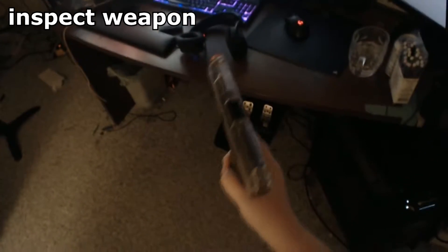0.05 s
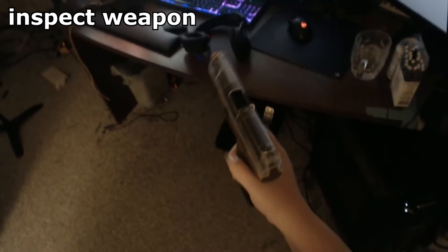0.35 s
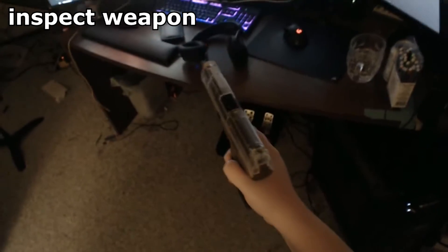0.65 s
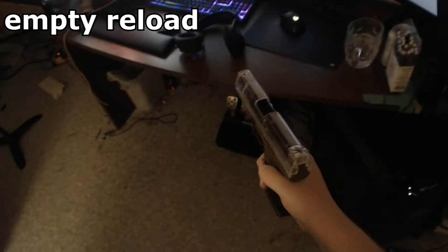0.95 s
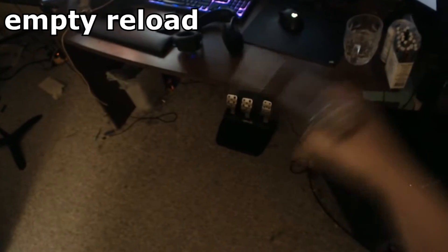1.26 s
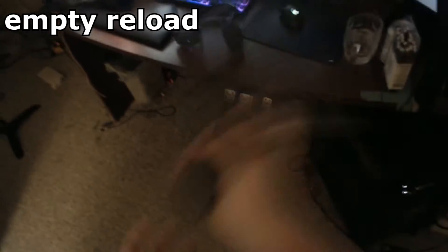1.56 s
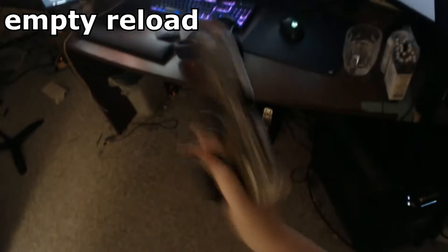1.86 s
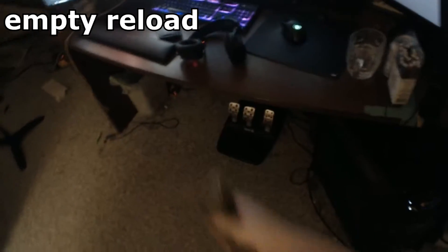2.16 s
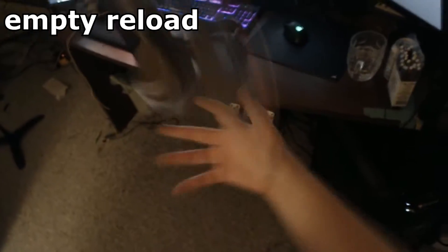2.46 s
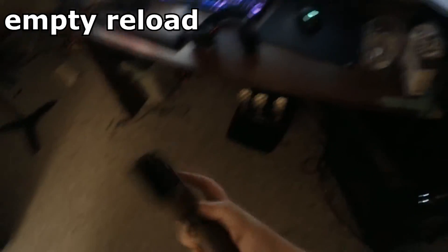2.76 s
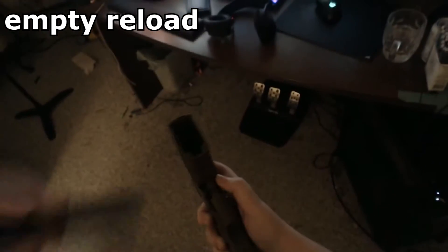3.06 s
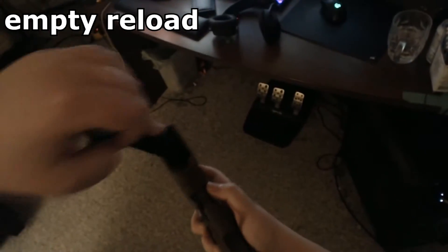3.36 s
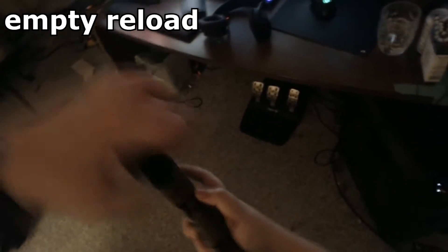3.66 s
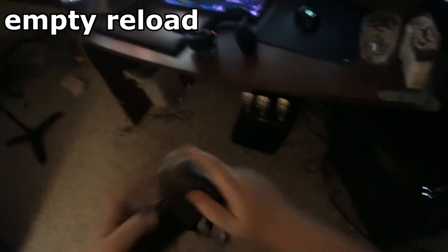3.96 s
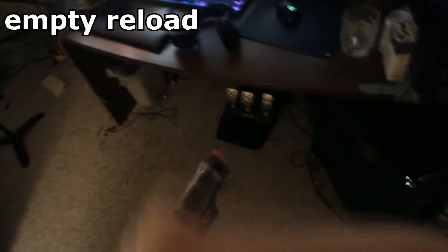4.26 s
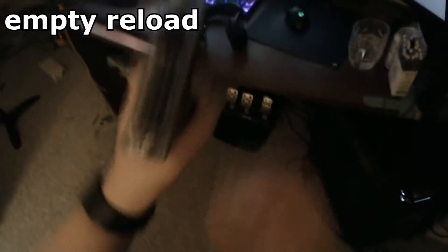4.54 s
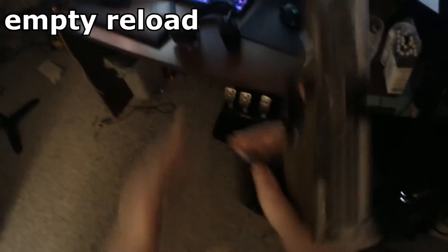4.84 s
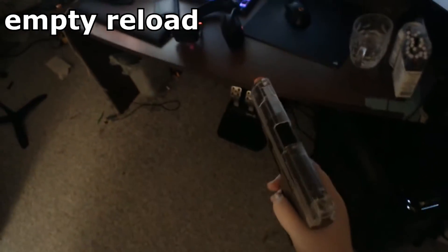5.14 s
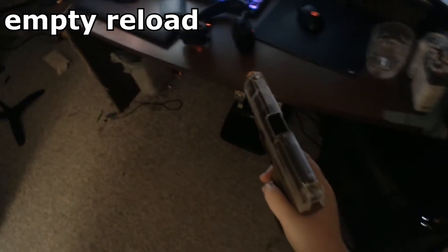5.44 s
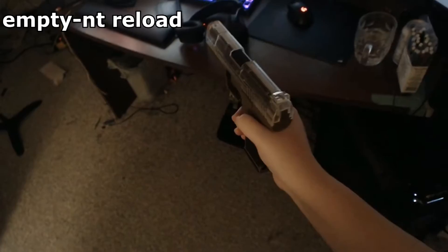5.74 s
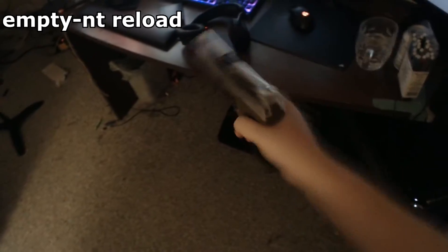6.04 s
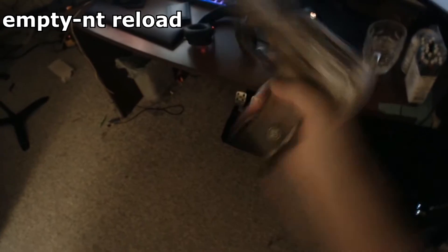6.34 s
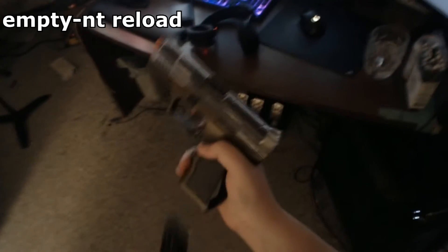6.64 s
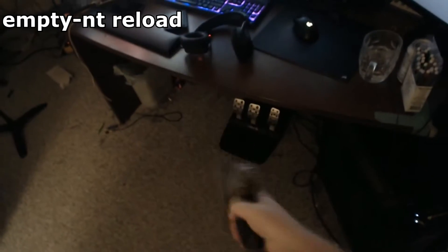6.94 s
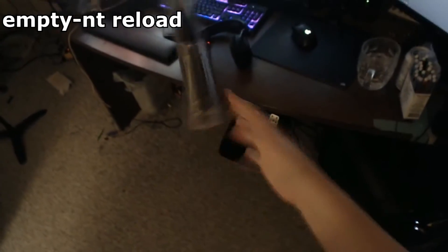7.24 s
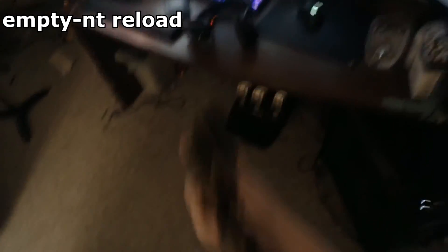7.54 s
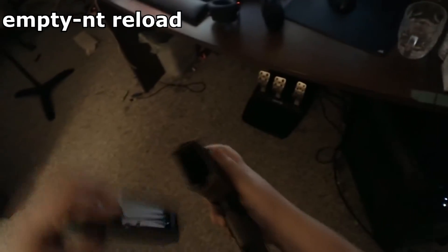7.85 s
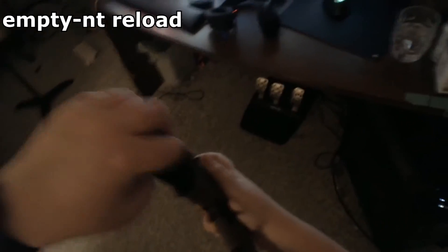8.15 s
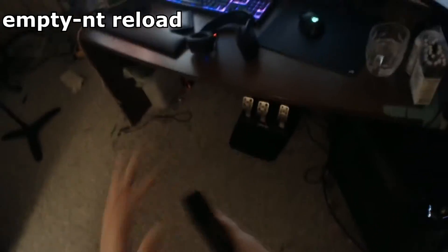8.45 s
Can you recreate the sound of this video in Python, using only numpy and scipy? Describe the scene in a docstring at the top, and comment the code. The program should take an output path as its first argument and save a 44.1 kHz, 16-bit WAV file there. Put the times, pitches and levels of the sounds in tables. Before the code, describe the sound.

A pistol is handled and reloaded twice, with sharp metallic magazine clicks and one slide rack, in a quiet room.

```python
"""A small, quiet room with humming equipment; a pistol is handled close to the microphone.
At 1.5 s the magazine knocks its way out, then the gun is flipped and caught in the palm. A magazine
taps the well and latches at 3.6 s; the slide is racked and slams shut at 4.3 s. A faint squeak of skin,
and from 6.2 s a second reload, pushed home at 8.2 s. Each blow and scrape rings the steel and the
room; loose parts tick and ping in between."""
import sys
import numpy as np
from scipy import signal
from scipy.fft import rfft, irfft
from scipy.io import wavfile
from scipy.ndimage import uniform_filter1d

SR = 44100
rng = np.random.default_rng(int(sys.argv[2]) if len(sys.argv) > 2 else 0)


def materialize(psi):
    """Save the field psi as 16-bit PCM at rate SR to the path in sys.argv[1].

    A 1-D psi becomes a single channel; in a 2-D psi each row is a channel.
    """
    bounded = np.clip(np.atleast_2d(psi).T, -1, 1)
    quanta = np.round(bounded * 32767).astype(np.int16)
    wavfile.write(sys.argv[1], SR, quanta)


N = 383669
LENGTH = 24576  # samples in one event and its tail


def amp(db):
    return 10 ** (np.asarray(db) / 20)


def unit_rms(x):
    return x / np.sqrt(np.mean(x ** 2) + 1e-20)


def curve_at(points, hz):
    """Straight lines between points on a log-frequency axis."""
    point_hz, value = np.transpose(points)
    return np.interp(np.log(hz + 1), np.log(point_hz + 1), value)


def add(mix, start_s, sound):
    part = mix[max(round(start_s * SR), 0):][:len(sound)]
    part += sound[:len(part)]


def bell(hz, centre_hz, width_hz):
    """The outline of one resonance, 1 at its centre."""
    return 1 / (1 + (2 * (hz - centre_hz) / width_hz) ** 2)


def flat_noise():
    """Noise with an even spectrum: all colour is left to the resonances."""
    return unit_rms(irfft(np.exp(2j * np.pi * rng.random(LENGTH // 2 + 1)), LENGTH))


def wander(count):
    """Slow drift of about unit size; a higher count moves faster."""
    return signal.resample(rng.standard_normal(count), 2 ** 19)[:N]


def knock(hz, decay_s):
    """A heavily damped resonance that swells for a moment and dies."""
    t = np.arange(LENGTH) / SR
    return t / decay_s * np.exp(1 - t / decay_s) * np.sin(2 * np.pi * hz * t)


# Colour of the air in the room: frequency_hz, gain_db
AIR_SPECTRUM = [(15,-6), (30,-5), (60,-4.5), (100,-3), (160,-4), (230,-3.5), (320,-10), (1000,-11.5),
                (1500,-20), (2100,-19), (2700,-27), (5000,-33.5), (8000,-36), (15500,-35)]
# The fan tone swells and sags: time_s, level_db
FAN_LEVELS = [(0.0, -72.5), (0.4, -64), (0.8, -62.5), (1.05, -58.5), (1.85, -65.5), (2.25, -61.5),
              (2.5, -71.5), (2.85, -60), (3.6, -57), (5.36, -58), (5.52, -69), (5.63, -59), (6.4, -58.5),
              (7.3, -55.5), (8.7, -60.5)]
def room_tone():
    """The bed of the room: air with a drifting hiss, a wavering fan tone and mains hum."""
    hz, t = np.fft.rfftfreq(N, 1 / SR), np.arange(N) / SR
    air = unit_rms(irfft(rfft(rng.standard_normal(N)) * amp(curve_at(AIR_SPECTRUM, hz)), N))
    hiss = irfft(rfft(air) * (1 - bell(hz, 0, width_hz=3800)), N)
    fan_db = np.interp(t, *np.transpose(FAN_LEVELS)) + 1.3 * wander(count=150)
    fan_hz = 124.5 + wander(count=90)
    fan = amp(fan_db) * np.sin(2 * np.pi * np.cumsum(fan_hz) / SR)
    mains = amp(-75.5) * np.sin(2 * np.pi * 60 * t) + amp(-71) * np.sin(2 * np.pi * 120 * t)
    hiss_lift_db = 1.5 + 0.36 * wander(count=12)
    air += hiss * (amp(hiss_lift_db) - 1)
    return amp(-64.5) * air + np.sqrt(2) * (fan + mains)


def fuzzy_tones(rows):
    """Short, unsteady tones: noise in one narrow resonance, faded in and out."""
    out, hz = np.zeros(N), np.fft.rfftfreq(LENGTH, 1 / SR)
    for start_s, end_s, pitch_hz, width_hz, level_db in rows:
        size = round((end_s - start_s) * SR)
        tone = irfft(rfft(flat_noise()) * bell(hz, pitch_hz, width_hz))[:size]
        add(out, start_s, amp(level_db) * unit_rms(tone) * signal.windows.tukey(size, .5))
    return out


# Spells of drone in the background: start_s, end_s, pitch_hz
DRONES = [(4.579, 4.798, 222), (4.85, 5.1, 225), (6.499, 6.777, 215), (7.268, 7.46, 213),
          (7.549, 7.797, 222)]
def low_drone(width_hz=31, level_db=-64):
    """A faint, low band of noise comes and goes."""
    return fuzzy_tones([(*spell, width_hz, level_db) for spell in DRONES])


# Reverberation of the small room: frequency_hz, t60_s
ROOM_DECAY = [(100, .12), (350, 0.13), (600, 0.37), (1000, 0.34), (1800, 0.29), (4500, 0.31), (8000, .25),
              (15000, .21)]
def room_tail():
    """Diffuse sound of the room; it builds quickly and lingers longest in the midrange."""
    hz, t, spectrum = signal.stft(flat_noise(), SR, nperseg=256)
    decay = amp(-60 * t / curve_at(ROOM_DECAY, hz)[:, None])
    tail = signal.istft(spectrum * decay, SR, nperseg=256)[1][:LENGTH]
    return tail * (1 - np.exp(-np.arange(LENGTH) / SR / 0.0015))


# A squeak and its overtone: start_s, end_s, pitch_hz, width_hz, level_db
SQUEAK = [(5.895, 6.005, 2300, 140, -68), (5.9, 6.0, 6200, 200, -87)]
def skin_squeak():
    """Skin squeaks faintly on the grip."""
    return fuzzy_tones(SQUEAK)


# Soft bumps close to the microphone: start_s, pitch_hz, level_db, decay_s
BUMPS = [(3.635, 45, -50.5, 0.0087), (4.299, 36, -45, .012), (4.299, 88, -47, .014),
         (5.386, 84.7, -54, 0.012)]
def hand_bumps():
    """The hand takes up blows with a low push."""
    out = np.zeros(N)
    for start_s, pitch_hz, level_db, decay_s in BUMPS:
        add(out, start_s, amp(level_db) * knock(pitch_hz, decay_s))
    return out


# A small loose steel part pings: start_s, level_db, upper_db
PINGS = [(1.04,-64,-11), (1.72,-55.5,-18), (1.926,-52.5,-15.5), (3.425,-57,-24), (6.762,-59,-19),
         (6.84,-51.5,-8), (6.909,-56.5,5.5), (7.045,-56,-14), (7.44,-48.5,-9)]
# Its modes, each taking a share of upper_db: pitch_hz, gain_db, t60_s, upper_share
PING_MODES = [(7760, -6, 0.24, 0.11), (8000, 1, 0.22, 0.52), (11900, -6, 0.21, 0.95), (12900, -21, .14, 1)]
def steel_pings():
    """Thin steel rings on; the room makes each mode flutter."""
    out, t = np.zeros(N), np.arange(LENGTH) / SR
    for start_s, level_db, upper_db in PINGS:
        for pitch_hz, gain_db, t60_s, upper_share in PING_MODES:
            noise = rng.standard_normal((2, LENGTH))
            drift = unit_rms(uniform_filter1d(uniform_filter1d(noise, 170), 120))
            flutter = .8 + .7 * (drift[0] + 1j * drift[1])
            tone = np.exp(2j * np.pi * pitch_hz * rng.uniform(0.97, 1.008) * t)
            envelope = amp(level_db + gain_db + upper_share * upper_db - 60 * t / t60_s)
            add(out, start_s, envelope * (flutter * tone).imag)
    return out


# Narrow resonances of the steel frame, heard in every blow: pitch_hz, width_hz, gain_db
FRAME_MODES = [(862,8.3,6), (1260,40,6), (1570,25,4), (1730,35,7), (2010,47,3), (3155,110,6.5), (3690,49,5),
               (3900,49,6.5), (4170,30,4), (4760,22,3), (5770,75,7.5), (6920,30,4.5), (7966,35,2.5),
               (9300,56,2), (9030,40,6.5), (11080,50,4.5)]
def ring(force, body, modes, hollow_db, bright_db):
    """Passes a force through a part of the gun; minimum phase, so the modes ring after the blow."""
    hz = np.fft.rfftfreq(LENGTH, 1 / SR)
    db = curve_at(body, hz)
    db += sum(gain * bell(hz, pitch, width) for pitch, width, gain in [*modes, *FRAME_MODES])
    db += hollow_db * bell(hz, centre_hz=1015, width_hz=300)  # the hollow magazine well
    db += bright_db * curve_at([(2200, 0.12), (6000, 1.5), (15000, 2.1)], hz)  # treble tilt
    log_gain = np.log(amp(np.r_[db, db[-2:0:-1]]))
    response = np.exp(np.conj(signal.hilbert(log_gain)))[:len(hz)]
    return irfft(rfft(force, LENGTH) * response)


def blows(hits, body, modes, crack_db, chatter_db, chatter_s):
    """Each blow is a crack, a spiky chatter of parts that settle abruptly in their play, and the room."""
    out, t = np.zeros(N), np.arange(LENGTH) / SR
    level_span_s = .02  # a blow has the energy of its level held this long
    for start_s, level_db, hollow_db, bright_db in hits:
        crack = amp(crack_db) * flat_noise() * np.exp(-t / 0.00074)
        spikes = unit_rms(flat_noise() * amp(3.5 * np.minimum(rng.exponential(1, LENGTH), 4)))
        chatter = amp(chatter_db) * spikes * np.exp(-(t / chatter_s) ** 2 / 2)
        sound = ring(crack + chatter + room_tail(), body, modes, hollow_db, bright_db)
        add(out, start_s, amp(level_db) * sound * np.sqrt(level_span_s * SR / np.sum(sound ** 2)))
    return out


def rubs(strokes, body, modes, slips_per_s, hollow_db, bright_db):
    """Sliding contact: tiny slips, swelling to the end of the stroke, excite the part and the room."""
    out = np.zeros(N)
    for start_s, end_s, level_db in strokes:
        size = int((end_s - start_s) * SR)
        slipping = rng.random(LENGTH)[:size] < slips_per_s / SR
        slips = slipping * rng.standard_normal(LENGTH)[:size] * np.linspace(.4, 1, size)
        tail = room_tail()
        path_to_mic = .9 * signal.unit_impulse(LENGTH) + tail / np.linalg.norm(tail)
        force = signal.fftconvolve(slips, path_to_mic)[:LENGTH]
        sound = ring(force, body, modes, hollow_db, bright_db)
        add(out, start_s, amp(level_db) * sound * np.sqrt(size / (np.sum(sound ** 2) + 1e-20)))
    return out


# The gun knocks in the hand or lands in the palm: start_s, level_db, hollow_db, rebound_db
GRIP_HITS = [(1.04, -54.5, 10, -10), (1.324, -43.5, 2, -2.5), (1.383, -43, -5, -12),
             (1.936, -43.5, -3.5, -17), (2.173, -60, 4, 2), (2.472, -23.5, 2, -2), (2.622, -45, -13, -13.5),
             (2.833, -63, -10, -1.5), (2.952, -59, 9, -14), (3.978, -54, -7.5, -15),
             (4.584, -43.5, 11, -15), (4.691, -44, 3.5, -12), (6.063, -49.5, -4, -17),
             (6.762, -59, 0, -15.5), (6.84, -54.5, 4, -10), (6.909, -47, 1, -0.5), (7.045, -54.5, -1, -13),
             (7.379, -37.5, 2.5, 5.5), (7.452, -43.5, -1, -16), (7.511, -43, 3, -1.5),
             (7.674, -55, -0.5, -12)]
# The hand slides on the gun: start_s, end_s, level_db
GRIP_RUBS = [(1.02, 1.14, -63), (1.45, 1.525, -50), (1.888, 1.935, -57.5), (3.10, 3.14, -66),
             (3.86, 4.10, -60.5), (4.55, 4.68, -58), (4.92, 5.06, -65.5), (6.28, 6.38, -51),
             (7.745, 7.79, -61.5), (8.59, 8.63, -63)]
# Broad colour of the grip: frequency_hz, gain_db
GRIP_BODY = [(20, -43), (100, -30), (250, -26), (500, -19), (700, -8.5), (1000, -3.5), (1500, -1.5),
             (2100, 2), (2600, -14), (4000, -16.5), (8000, -21), (12000, -23.5), (15500, -27)]
# Its resonances: pitch_hz, width_hz, gain_db
GRIP_MODES = [(372.6,88,7.5), (875,60,2), (1043,160,6.5), (1308,35,5.5), (1890,60,1), (2230,97,1.5),
              (2668,160,7), (2790,150,9), (3031,390,10), (4000,470,7), (4990,237,9), (5920,307,5.5),
              (6911,160,6), (7800,320,10), (10900,230,5), (12884,180,6.5)]
def grip_handling():
    """The hand rubs and knocks the gun; after each knock loose parts cross their play and strike again."""
    knocks = []
    for start_s, level_db, hollow_db, rebound_db in GRIP_HITS:
        gap_s = .015 * amp(.3 * (-41 - level_db))  # sooner after a harder knock
        knocks.append((start_s, level_db, hollow_db))
        # The rebound is steel on steel and rings the well less.
        knocks.append((start_s + gap_s, level_db + rebound_db, hollow_db - 5.5))
    hits = [(s, db, hollow, 1.5 - 0.14 * hollow) for s, db, hollow in knocks]  # hollower is duller
    clacks = blows(hits, GRIP_BODY, GRIP_MODES, crack_db=3.5, chatter_db=2, chatter_s=.009)
    return clacks + rubs(GRIP_RUBS, GRIP_BODY, GRIP_MODES, slips_per_s=210, hollow_db=1.5, bright_db=.5)


# Knocks of the outgoing magazine: start_s, level_db, hollow_db, bright_db
RELEASE_HITS = [(1.451, -50.5, 6, 6), (1.529, -23.5, -1, 1.5), (1.552, -35, -13, 3), (1.581, -26, -2, -3),
                (1.593, -27.5, 2, 2), (1.72, -50, 2, 1.5), (6.23, -52.5, -3, 1), (6.256, -45, 3, 3),
                (6.277, -44, -5, 2.5), (6.366, -41.5, 9, -2), (6.384, -27, -2.5, 1), (6.402, -31, -17, 2.5),
                (6.439, -36.5, 2, 3.5), (6.476, -35, -1, 2)]
# Their broad colour: frequency_hz, gain_db
RELEASE_BODY = [(20, -23), (100, -26.5), (250, -17), (500, -20.5), (700, -7), (1000, -6), (1500, -3.5),
                (2100, -7), (2600, -10.5), (4000, -11), (8000, -17.5), (12000, -24.5), (15500, -30)]
# Their resonances: pitch_hz, width_hz, gain_db
RELEASE_MODES = [(362, 69, 2.6), (1010, 296, 15.7), (1563, 86, 4.5), (1980, 590, 16.3), (2940, 450, 6.4),
                 (3770, 110, 8), (4950, 170, 8.9), (7000, 250, 6.4), (7860, 120, 13), (8760, 320, 6.0),
                 (9900, 240, 5.6), (11120, 233, 6.9), (11770, 250, 11), (12600, 320, 10.5),
                 (13900, 350, 10.6), (14835, 350, 10.9)]
def magazine_release():
    """The catch lets go and the magazine knocks its way out."""
    return blows(RELEASE_HITS, RELEASE_BODY, RELEASE_MODES, crack_db=6, chatter_db=2, chatter_s=.01)


# The magazine meets the mouth of the well: start_s, level_db, bouncing_s
WELL_TAPS = [(3.369, -39, .08), (3.566, -38.5, .035), (8.068, -47, .01)]
def well_bounces(first_gap_s=.025, gap_ratio=.89, loss_db=3, hollow_db=10, bright_db=-4):
    """Hits of the magazine bouncing ever faster and weaker until the hand steadies it."""
    delays_s = np.r_[0, np.cumsum(first_gap_s * gap_ratio ** np.arange(10))]
    hits = []
    for start_s, level_db, bouncing_s in WELL_TAPS:
        for bounce, delay_s in enumerate(delays_s[delays_s <= bouncing_s]):
            hits.append((start_s + delay_s, level_db - bounce * loss_db, hollow_db, bright_db))
    return hits


def well_notes():
    """The magazine well answers each bounce with a hollow note."""
    out = np.zeros(N)
    for start_s, level_db, _, _ in well_bounces():
        note = knock(hz=1045 * rng.uniform(0.98, 1.02), decay_s=0.0031)
        add(out, start_s, amp(level_db + 9.5) * note)
    return out


# Knocks of the incoming magazine: start_s, level_db, hollow_db, bright_db
SEAT_HITS = [(3.604, -27.5, 8, -4), (3.628, -25.5, 7.5, 0), (3.633, -16, -3.5, .5), (3.65, -23.5, -9, -7.5),
             (8.043, -35, 4, -0.5), (8.13, -31.5, 4.5, -7), (8.165, -29.5, -10, -4), (8.177, -27, -16, 1),
             (8.198, -18, -3, 0), (8.382, -42.5, 7.5, -3.5)]
# It scrapes in the well: start_s, end_s, level_db
SEAT_RUBS = [(3.51, 3.565, -48.5), (3.58, 3.63, -35.5), (8.135, 8.198, -28), (8.45, 8.68, -65)]
# Broad colour of both: frequency_hz, gain_db
SEAT_BODY = [(20, -20.5), (100, -14.5), (250, -24), (500, -33.5), (700, -13), (1000, 5), (1500, -4),
             (2100, -2), (2600, -2.5), (4000, -5.5), (8000, -13.5), (12000, -8.5), (15500, -17)]
# Their resonances: pitch_hz, width_hz, gain_db
SEAT_MODES = [(370.5, 180, 18.4), (566, 177, 16.8), (950, 95, 3.9), (1330, 130, 6.8), (1493, 120, 2),
              (1950, 590, 9.2), (2220, 35, 10.6), (2920, 200, 7), (3835, 190, 3.9), (4830, 160, 9.1),
              (5090, 131, 13), (5960, 260, 11.6), (7000, 520, 9.8), (7880, 390, 14.2), (8690, 460, 10.0),
              (9796, 128, 7.3), (10200, 120, 7.1), (11610, 200, 4.1), (12060, 240, 6.8), (13700, 214, 4.8),
              (14200, 240, 9.5), (14683, 263, 8.9)]
def magazine_seating():
    """The magazine bounces into the well, rides up and latches."""
    hits = SEAT_HITS + well_bounces()
    clacks = blows(hits, SEAT_BODY, SEAT_MODES, crack_db=7, chatter_db=4, chatter_s=.0089)
    return clacks + rubs(SEAT_RUBS, SEAT_BODY, SEAT_MODES, slips_per_s=840, hollow_db=6, bright_db=-7.5)


# Blows of the slide, the loudest at the microphone: start_s, level_db, hollow_db, bright_db
SLIDE_HITS = [(4.144, -48, 8, -2.5), (4.158, -35.5, 5, -4.5), (4.18, -27, 5, -1), (4.284, -31.5, 4.5, -2),
              (4.296, -17.5, -2.5, 4.5), (4.3, -10.5, -1, -1.5), (4.322, -30, 10, 9.5)]
# It scrapes back, then forward: start_s, end_s, level_db
SLIDE_RUBS = [(4.146, 4.18, -35.5), (4.20, 4.295, -42.5)]
# Broad colour of the slide: frequency_hz, gain_db
SLIDE_BODY = [(20, -19.5), (100, -10.5), (250, -13.5), (500, -15.5), (700, -3.5), (1000, -4), (1500, 0.8),
              (2100, 0), (2600, 0.1), (4000, -9), (8000, -5), (12000, -10), (15500, -12.5)]
# Its resonances: pitch_hz, width_hz, gain_db
SLIDE_MODES = [(360.2,72,14), (830,85,2), (1310,66,7), (1530,100,8.1), (1940,350,8), (3090,280,11),
               (3820,330,12), (4220,171,10), (4753,230,8.2), (5020,440,10), (5930,270,16), (7020,350,8),
               (7530,200,7.1), (7900,350,7.2), (8575,140,8.7), (8830,280,12), (10000,510,9), (10931,310,10),
               (11570,280,11), (12080,200,5.934), (12954,280,7), (13050,420,6), (13800,335,8),
               (14000,204,7), (15028,350,6)]
def slide_rack():
    """The slide is drawn back, stops, flies forward and slams shut."""
    clacks = blows(SLIDE_HITS, SLIDE_BODY, SLIDE_MODES, crack_db=8.5, chatter_db=4.5, chatter_s=.012)
    scrapes = rubs(SLIDE_RUBS, SLIDE_BODY, SLIDE_MODES, slips_per_s=2200, hollow_db=3, bright_db=-5.5)
    return clacks + scrapes


def scene():
    """One microphone: the pistol and its small side sounds up close, the room behind."""
    pistol = grip_handling() + magazine_release() + magazine_seating() + slide_rack()
    side_sounds = steel_pings() + hand_bumps() + well_notes() + skin_squeak()
    return (pistol + side_sounds + low_drone() + room_tone())[None]


def record(dry):
    """The loudest peaks round off at full scale; the converter adds a small offset; then the band limit."""
    rounded = dry / (1 + dry ** 6) ** (1 / 6) + .0013
    lowpass = signal.firwin(511, cutoff=16300, window=("kaiser", 9), fs=SR)
    return signal.oaconvolve(rounded, lowpass[None], "same")


dry = scene()
out = record(dry)
materialize(out)
```